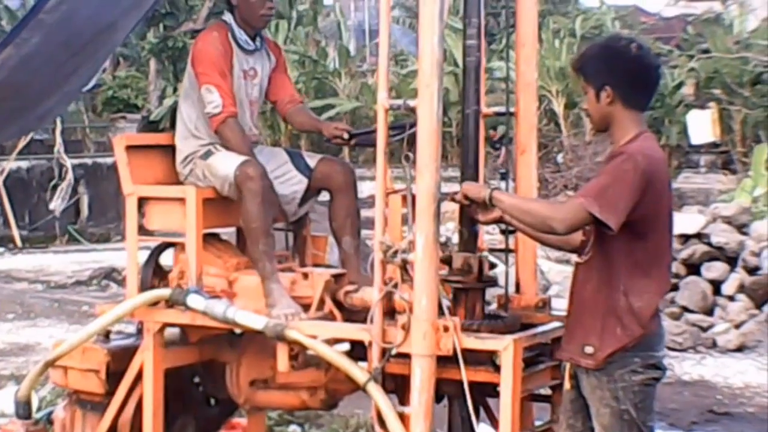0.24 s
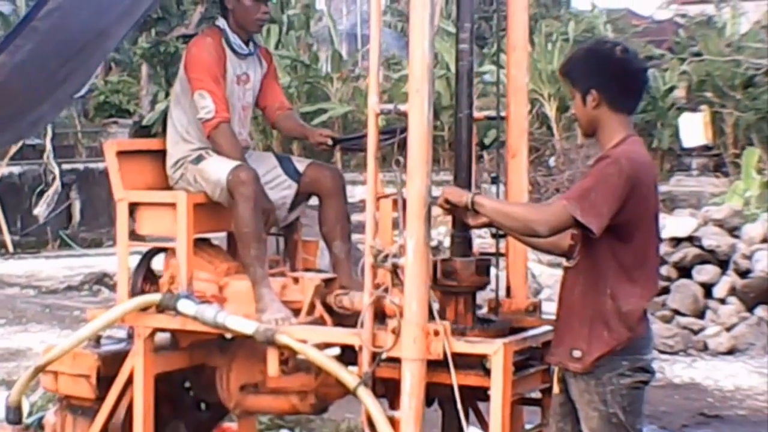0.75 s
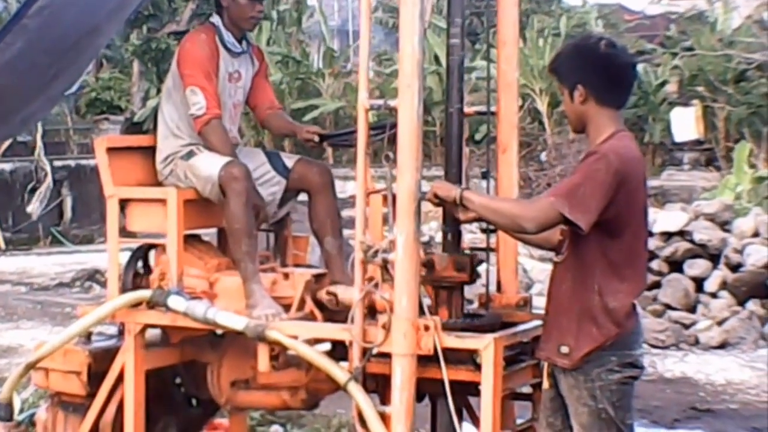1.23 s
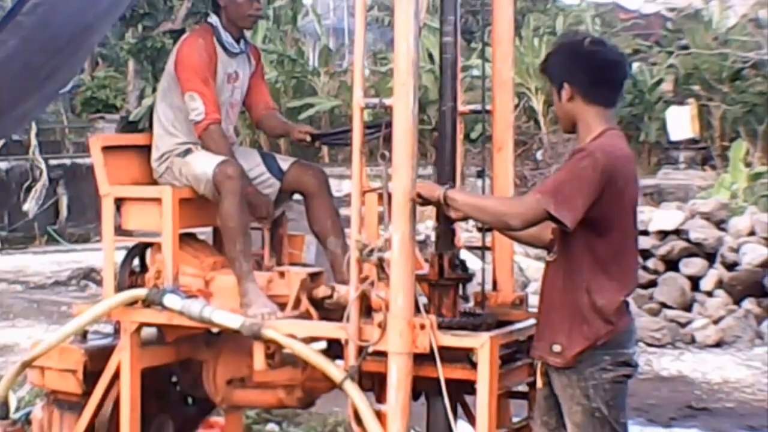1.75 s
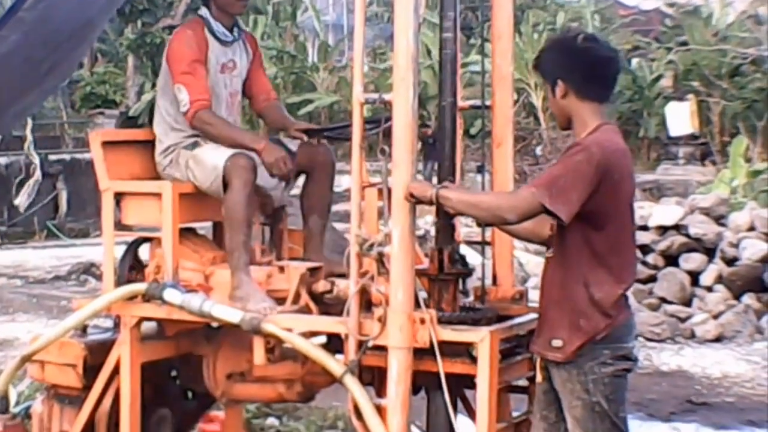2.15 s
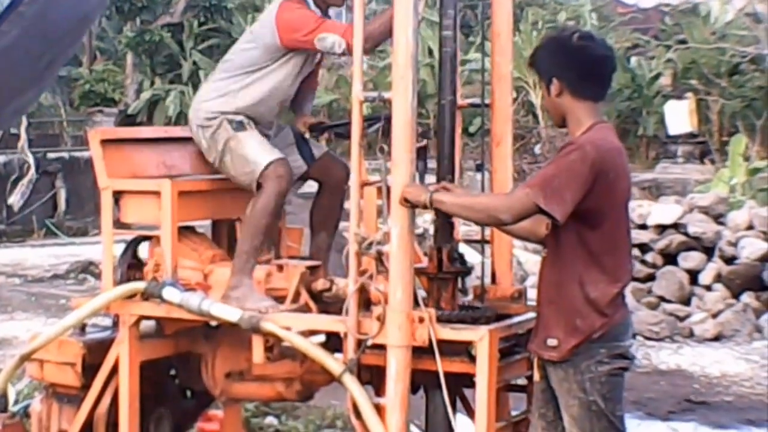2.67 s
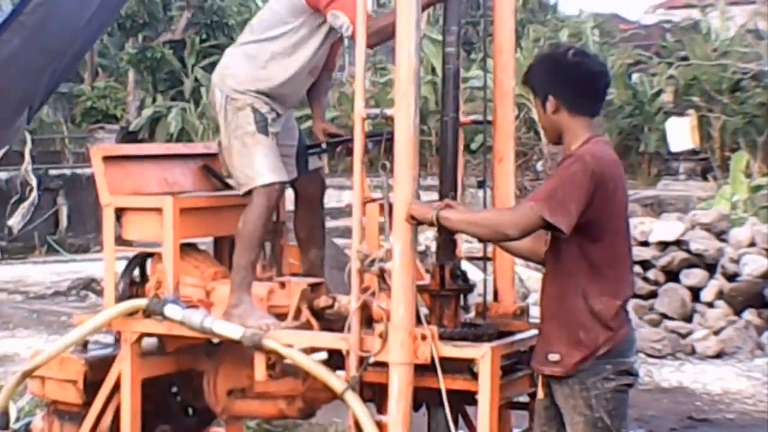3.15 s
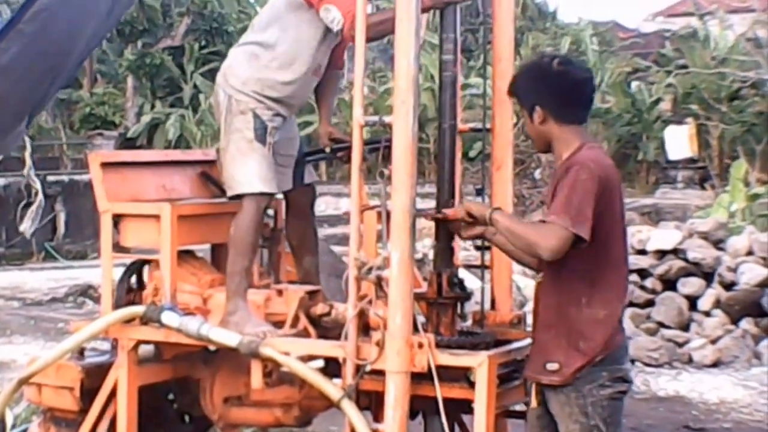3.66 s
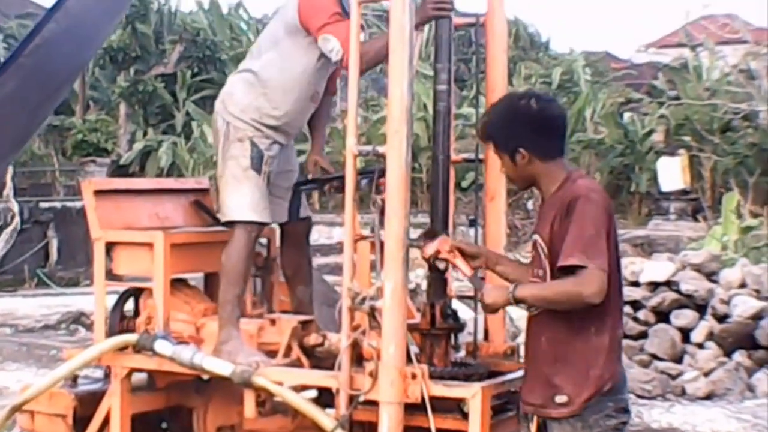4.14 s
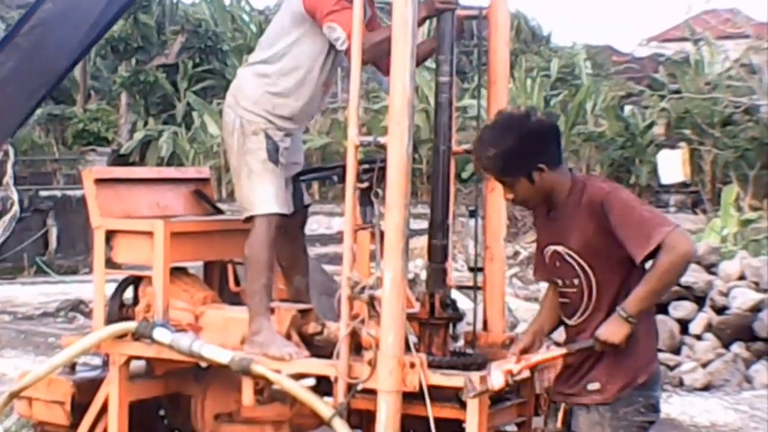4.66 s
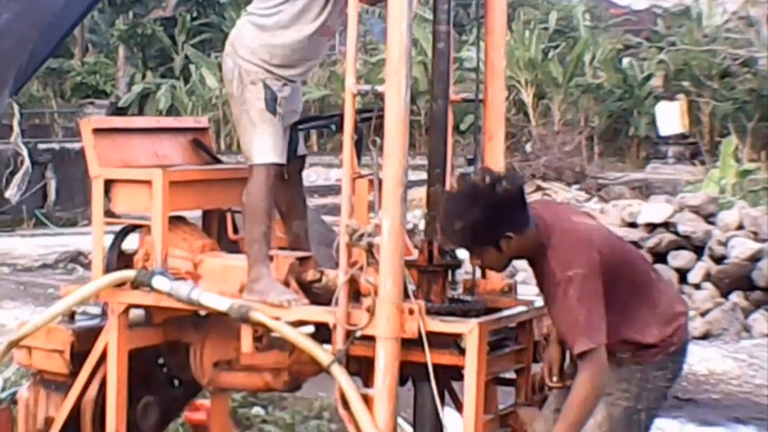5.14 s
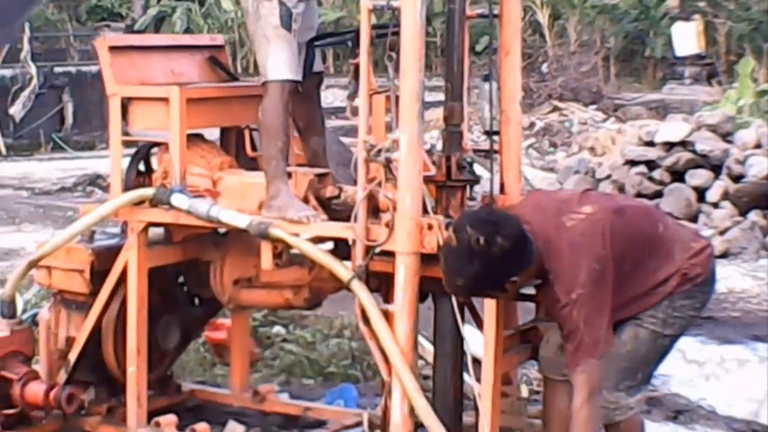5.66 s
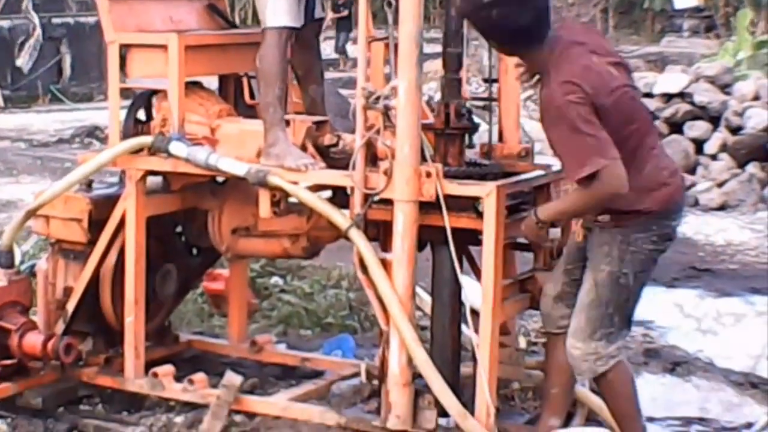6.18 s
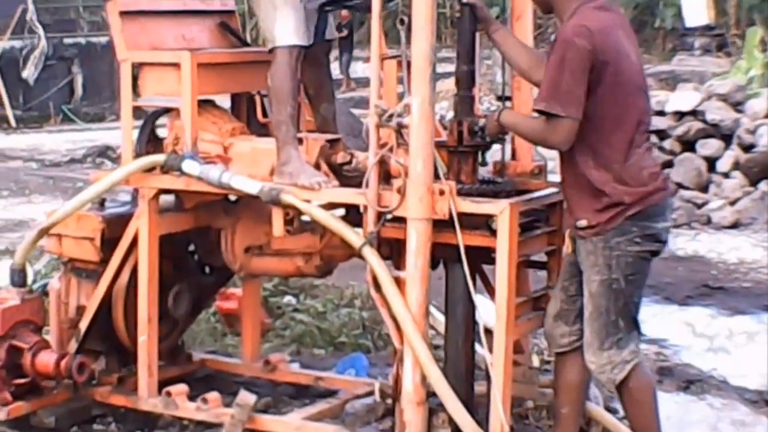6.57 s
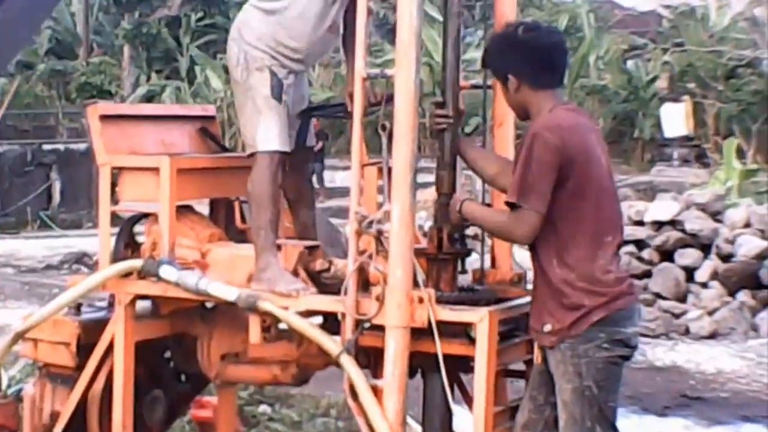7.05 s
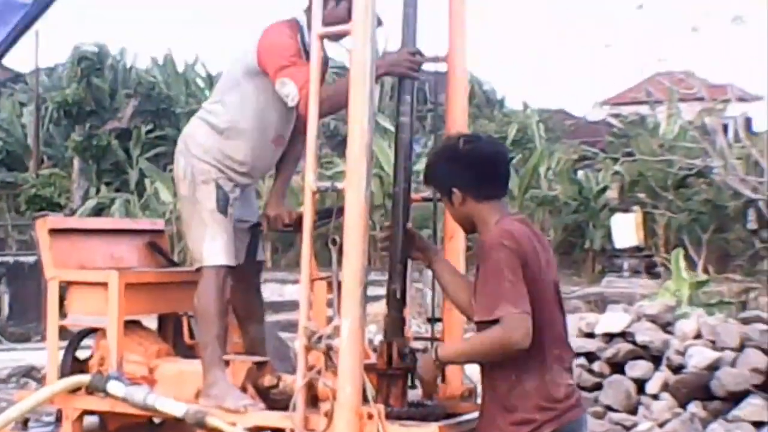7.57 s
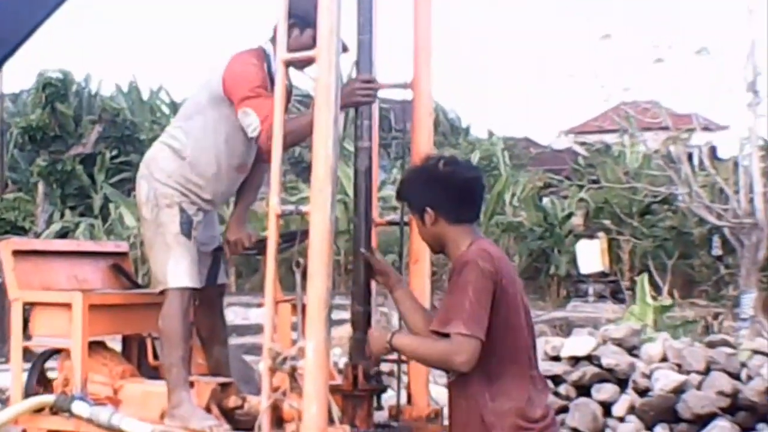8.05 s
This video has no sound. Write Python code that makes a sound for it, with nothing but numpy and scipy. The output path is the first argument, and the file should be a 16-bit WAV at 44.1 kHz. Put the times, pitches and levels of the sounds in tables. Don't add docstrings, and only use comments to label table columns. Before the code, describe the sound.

From 0 to 8.3 seconds a single-cylinder diesel engine idles without pause on an outdoor drilling rig, firing about nine times a second. Each cycle gives dull low puffs, knocks and a droning casing, with dense steel frame clatter and thinner bright valve rattle above; a soft ground rumble lies beneath. Cycles vary slightly and the rattle loosens and tightens gently. Small loose-link ticks come at 4.85 and 5.18. At 5.42 a dropped wrench clanks on steel, a short, hard bouncing burst with little ring; at 5.89 it lands again, lighter and higher. More ticks cluster at 6.5 to 6.7, with a very faint one at 7.7. The microphone is close, nearing slightly by 6 seconds, turning aside from 6.3, then backing away after 7.5, so the engine fades by several decibels but never stops. Sound is somewhat crude, with gritty mirrored treble.

```python
import sys
import numpy as np
from scipy import signal
from scipy.io import wavfile
from scipy.ndimage import uniform_filter1d

SR = 44100
rng = np.random.default_rng(int(sys.argv[2]) if len(sys.argv) > 2 else 0)


def output_pcm(signal):
    pcm = np.clip(np.atleast_2d(signal).T, -1, 1) * 32767
    wavfile.write(sys.argv[1], SR, np.round(pcm).astype(np.int16))


def field_ratio(decibels):
    return 10 ** (np.asarray(decibels, dtype=float) / 20)


N = 366471


def rms_one(x):
    return x / np.sqrt(np.mean(x ** 2) + 1e-20)


def resonance(x, hz, width):
    r = np.exp(-np.pi * width / SR)
    top = [(1 - r * r) / 2, 0, (r * r - 1) / 2]
    return signal.lfilter(top, [1, -2 * r * np.cos(2 * np.pi * hz / SR), r * r], x)


def twice(x, hz, width):
    return resonance(resonance(x, hz, width), hz, width)


def fading(clicks, t60):
    return signal.lfilter([1], [1, -field_ratio(-60 / (t60 * SR))], clicks)


def ring(clicks, hz, t60):
    r, w = field_ratio(-60 / (t60 * SR)), 2 * np.pi * hz / SR
    return signal.lfilter([0, np.sin(w)], [1, -2 * r * np.cos(w), r * r], clicks + 1e-18)


def ground_rumble():
    # resonance in Hz, width in Hz, level in dB.
    ground = [(24, 10, 0.5), (50, 69, 1.5), (127, 150, 8.2), (230, 173, 9.9), (346, 56, 7)]
    return rms_one(sum(field_ratio(db) * twice(rng.standard_normal(N), hz, width) for hz, width, db in ground))


def ticks():
    # start in seconds, peak level in dB, resonance in Hz, width in Hz.
    loose_links = [
        (4.846, -31, 4200, 1100),
        (4.903, -48, 6300, 293),
        (5.1757, -32.5, 4200, 900),
        (6.457, -50, 6300, 300),
        (6.53, -34, 4300, 600),
        (6.619, -29, 4270, 1000),
        (6.635, -29.5, 4200, 1100),
        (6.655, -36, 3900, 900),
        (6.685, -40, 4200, 900),
        (7.674, -44, 6300, 250),
    ]
    out, length = np.zeros(N), 900
    for s, db, hz, width in loose_links:
        scratch = rng.standard_normal(length) * field_ratio(-60 * np.arange(length) / (0.045 * SR))
        sound = twice(scratch, hz, width)
        start = round(s * SR)
        out[start:start + length] += field_ratio(db) * sound / np.max(np.abs(sound))
    return out


def steel_contacts(hits, modes, crack_db):
    at = [round(s * SR) for s, db in hits]
    hit_db = np.array(hits)[:, 1]
    out, clicks = np.zeros(N), np.zeros(N)
    for hz, level_db, t60 in modes:
        clicks[at] = field_ratio(hit_db + level_db + rng.normal(0, 2.0, len(at)))
        out += ring(clicks, hz, t60)
    clicks[at] = field_ratio(hit_db + crack_db)
    return out + rng.standard_normal(N) * fading(clicks, 0.01)


def dropped_wrench():
    # contact time in seconds, peak level in dB.
    clank_hits = [(5.4238, -17.5), (5.4246, -15), (5.4298, -15.5), (5.4318, -13), (5.4335, -19),
                  (5.4395, -27), (5.4445, -32), (5.4485, -27), (5.4505, -24), (5.456, -34), (5.463, -47)]
    clink_hits = [
        (5.8865, -33.5),
        (5.891, -31),
        (5.896, -35),
        (5.9025, -39),
        (5.915, -36),
        (5.926, -38),
        (5.932, -37),
    ]
    # pitch in Hz, level in dB, ring time t60 in seconds.
    clank_modes = [(1370, -19, 0.08), (1726, -6, .05), (1873, -11, 0.06), (2270, -11, 0.029),
                   (2800, -19, 0.042), (3150, -19, 0.059), (3630, -23, 0.051), (3880, -3.5, 0.014),
                   (3980, -19, 0.031), (4485, -4.5, 0.028), (4600, -10, 0.028), (5550, -15, 0.023),
                   (5750, -23, .03), (6724, -29, .04)]
    clink_modes = [(3225, -11, 0.05), (3670, 2, 0.09), (3780, -13, .08), (4161, -9, .07), (4470, -4, .07),
                   (4970, -6, .08), (5840, -14, .05), (7542, -12, .1)]
    clank = steel_contacts(clank_hits, clank_modes, crack_db=-11)
    return clank + steel_contacts(clink_hits, clink_modes, crack_db=-5)


def crank():
    # time in seconds, speed in cycles per second.
    idle_speed = [
        (1.9, 8.9954),
        (3.75, 9.0208),
    ]
    first_cycle_s = -0.0278
    s = first_cycle_s + np.arange(8450) / 1000
    speed = np.interp(s, *np.transpose(idle_speed))
    return s, (np.cumsum(speed) - speed[0]) / 1000


def each_cycle(place, spread_db, jitter_s):
    s, turns = crank()
    cycles = 77
    chance = rng.standard_normal((cycles, 2))
    at = np.interp(np.arange(cycles) + place, turns, s, left=9, right=9)
    at = at + jitter_s * chance[:, 0]
    inside = (at >= 0) & (at < (N - 1) / SR)
    clicks = np.full(N, 1e-18)
    clicks[(at[inside] * SR).astype(int)] = field_ratio(spread_db * chance[inside, 1])
    return clicks


def firing_strength():
    cycle = (np.interp(np.arange(N) / SR, *crank()) + 0.17).astype(int)
    strength = field_ratio(0.6 * rng.standard_normal(78))
    return uniform_filter1d(strength[cycle], size=90)


def shaking(blows, loose_db):
    power = field_ratio(-240 * np.arange(N) / SR)
    for place, db, t60 in blows:
        blow = field_ratio(db) * each_cycle(place, spread_db=loose_db, jitter_s=0.00054)
        power = power + fading(blow ** 2, t60 / 2)
    return np.sqrt(uniform_filter1d(power, size=110))


def frame_shaking():
    # place in cycle 0-1, level in dB, t60 of the shaking in seconds.
    frame_blows = [
        (.834, 1.5, 0.25),
        (.95, 3, 0.2),
        (.05, -3.5, 0.25),
        (.15, -1, 0.42),
        (.27, -2.5, 0.32),
        (.392, -2, 0.11),
        (.472, -7, 0.2),
        (.61, -5, 0.17),
    ]
    return shaking(frame_blows, loose_db=1.0)


def valve_tapping():
    # place in cycle 0-1, level in dB, t60 of the shaking in seconds.
    valve_blows = [
        (.855, 0, .13),
        (.95, -3.5, .16),
        (.088, 1, .2),
        (.25, -7, .16),
        (.375, -.5, .12),
        (.425, -2, .18),
        (.56, -8.5, .15),
        (.665, -6, .08),
    ]
    return shaking(valve_blows, loose_db=1.5)


def knocking():
    # place in cycle 0-1, level in the casing in dB, level in frame and valves in dB.
    seat_knocks = [
        (.845, -12, 0),
        (.905, -1, -4),
        (.975, 0, -6),
        (.09, -8, -5),
        (.165, -6, -9),
        (.25, -8, -9),
        (.375, -4, 0),
        (.44, -9, -5),
        (.525, -12, -4),
        (.655, -14, -4),
    ]
    hits = np.array([each_cycle(row[0], spread_db=1.8, jitter_s=0.00006) for row in seat_knocks])
    return field_ratio(np.array(seat_knocks)[:, 1:].T) @ hits


def clatter(modes, shake, knocks, per_s, grain_db, repeat, knock_db):
    # time in seconds, how far the microphone has turned aside (0 not at all, about 1 aside).
    turning = [
        (6.3, 0.25),
        (7.0, 0.63),
        (7.4, 0.97),
        (8.31, 1.14),
    ]
    t = np.arange(N) / SR
    angle = (np.interp(t, *crank()) % 1 * 4890).astype(int)
    turned = np.interp(t, *np.transpose(turning))
    sizes = field_ratio(grain_db * np.minimum(rng.exponential(1, (2, N)), 4)) * rng.standard_normal((2, N))
    grains = rms_one((rng.random((2, N)) < per_s / SR) * sizes)
    out = 0
    for k, (hz, width, db, turned_db) in enumerate(modes):
        fresh = grains[k % 2]
        rattle = np.sqrt(1 - repeat) * fresh + np.sqrt(repeat) * fresh[angle]
        struck = shake * rattle + field_ratio(knock_db) * knocks
        out = out + field_ratio(db + turned_db * turned) * twice(struck, hz, width)
    return rms_one(out)


def valve_rattle(tapping, sharp):
    # resonance in Hz, width in Hz, level in dB, change in dB once the microphone has turned.
    valve_modes = [(2950, 430, 0.5, -3), (3480, 580, -6, 3.5), (3730, 250, 2.5, -4), (4200, 690, -0.5, -2),
                   (4610, 640, -6.5, -1.5), (4970, 1300, -10.5, 1.5), (6300, 370, -9.5, -4),
                   (6710, 290, -12, -1)]
    return clatter(valve_modes, tapping, sharp, per_s=4500, grain_db=2.8, repeat=0.02, knock_db=14)


def frame_clatter(shake, sharp):
    # resonance in Hz, width in Hz, level in dB, change in dB once the microphone has turned.
    frame_modes = [(1130, 113, -5.5, 2), (1280, 68, 2.5, 2), (1386, 150, -2, 1), (1493, 246, -0.5, -7),
                   (1675, 95, -3, -3.5), (1878, 176, -7, -0.5), (2006, 84, -9, 5.5), (2072, 156, -13, 4.5),
                   (2256, 263, -9.5, -6)]
    return clatter(frame_modes, shake, sharp, per_s=3000, grain_db=2.2, repeat=0.05, knock_db=21)


def casing_drone(shake, dull):
    # resonance in Hz, width in Hz, level in dB, change in dB once the microphone has turned.
    casing_modes = [(490, 73, -10, 0.5), (603, 193, -13.5, 2), (766.6, 124, -6, -3.5),
                    (835, 80, -1.5, -5.5), (910, 94.5, 0.5, -6), (966, 130, -9.5, 0)]
    lag_s = 0.00745
    late = np.roll(shake, round(lag_s * SR))
    return clatter(casing_modes, late, dull, per_s=2000, grain_db=2.0, repeat=0.1, knock_db=27)


def puffs():
    # place in cycle 0-1, exhaust push +1 or intake suck -1, level in dB, pipe in Hz, width in Hz.
    valve_events = [
        (0.037, -1, 29, 131.9, 45.3),
        (0.039, -1, 23, 106.3, 50),
        (0.359, 1, 27, 201.2, 97),
        (0.364, 1, 24.5, 269, 39.7),
        (0.643, -1, 27.5, 174, 74.4),
        (0.639, -1, -0.5, 352, 45.3),
    ]
    out = 0
    for place, way, db, hz, width in valve_events:
        pushes = np.sign(way) * field_ratio(db) * each_cycle(place, spread_db=0.45, jitter_s=0.0001)
        out = out + twice(pushes, hz, width)
    mic_low_hz = 85
    return rms_one(signal.sosfilt(signal.butter(3, mic_low_hz, "high", fs=SR, output="sos"), out))


def scene():
    # time in seconds, level in dB.
    nearness = [
        (5.4, -0.4),
        (6.0, 0.9),
        (7.46, 0.94),
        (7.8, -1.4),
        (8.13, -4.5),
        (8.31, -5.1),
    ]
    # time in seconds, level in dB.
    looseness = [(0.36, -1), (0.92, 1.2), (1.5, 0.2), (3.7, -0.66), (4.25, -1.4), (4.8, 1.1), (5.36, -0.6),
                 (5.9, 0.5), (6.47, -1.1), (7.0, 1.3), (8.31, 1.5)]
    t = np.arange(N) / SR
    near_db = np.interp(t, *np.transpose(nearness))
    loose_db = np.interp(t, *np.transpose(looseness))
    puff_level = field_ratio(-29.5 + near_db)
    casing_level = field_ratio(-29 + near_db + 0.52 * loose_db)
    frame_level = field_ratio(-31 + near_db + 0.78 * loose_db)
    valve_level = field_ratio(-46 + near_db + 0.34 * loose_db)

    burn = firing_strength()
    shake, tapping = burn * frame_shaking(), burn * valve_tapping()
    dull, sharp = knocking()
    engine = puff_level * (puffs() + field_ratio(-9.5) * ground_rumble())
    engine += casing_level * casing_drone(shake, dull)
    engine += frame_level * frame_clatter(shake, sharp)
    engine += valve_level * valve_rattle(tapping, sharp)
    return (engine + ticks() + dropped_wrench())[None]


def band_limit(x):
    return signal.sosfilt(signal.butter(12, 16410, fs=SR, output="sos"), x)


def record(dry):
    mic_top_hz, recorder_top_hz = 6950, 15740
    mic = signal.sosfilt(signal.ellip(8, 0.5, 50, mic_top_hz, fs=SR, output="sos"), dry)
    mic = signal.sosfilt(signal.butter(1, 30, "high", fs=SR, output="sos"), mic)
    mic = signal.lfilter(*signal.iirnotch(492, 6, SR), mic)
    fast = signal.resample_poly(mic, 160, 147, axis=1, padtype="line")
    held = fast[:, np.arange(N) * 160 // 147]
    mix = signal.sosfilt(signal.ellip(12, 0.5, 70, recorder_top_hz, fs=SR, output="sos"), held)
    return band_limit(mix)


dry = scene()
out = record(dry)
output_pcm(out)
```